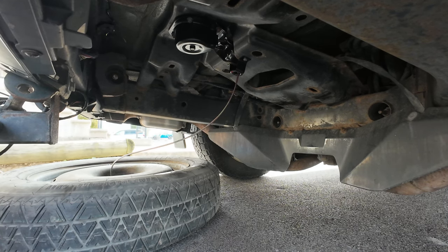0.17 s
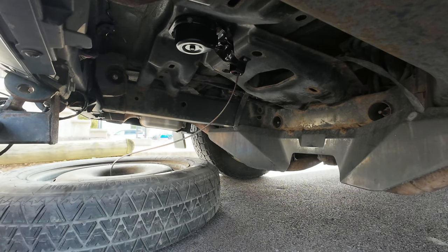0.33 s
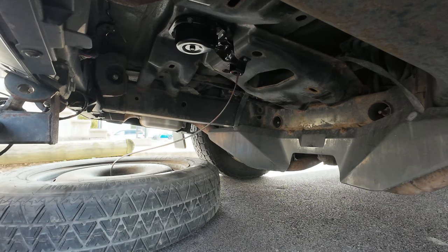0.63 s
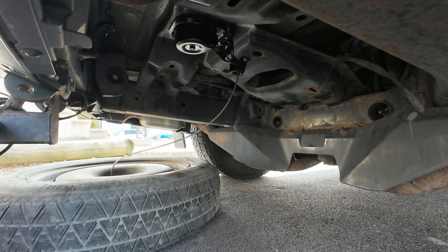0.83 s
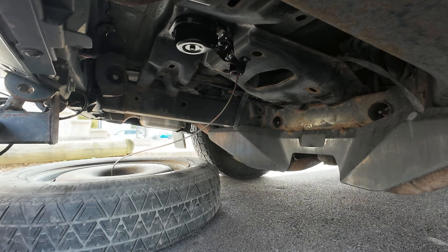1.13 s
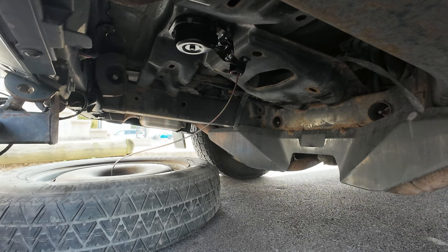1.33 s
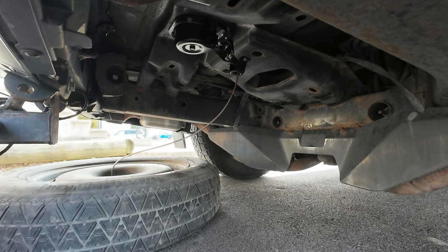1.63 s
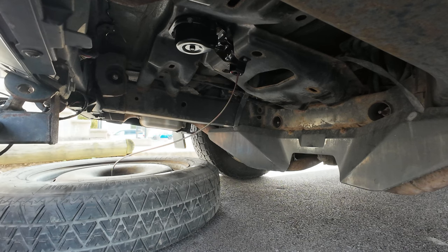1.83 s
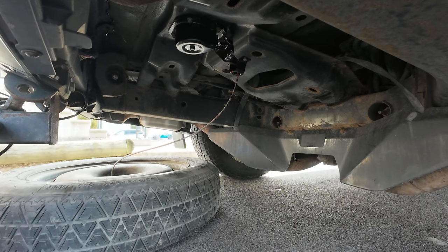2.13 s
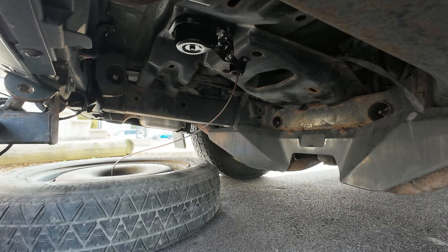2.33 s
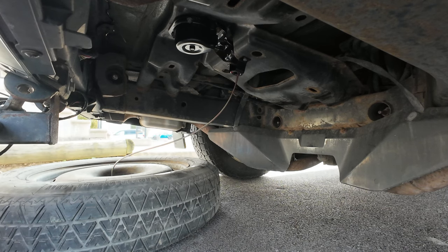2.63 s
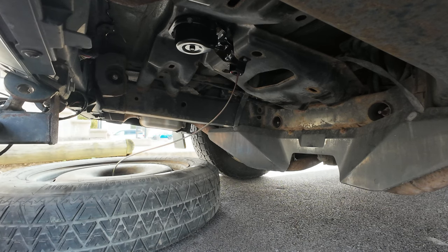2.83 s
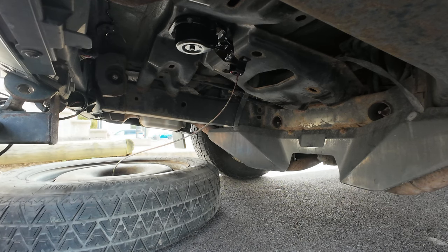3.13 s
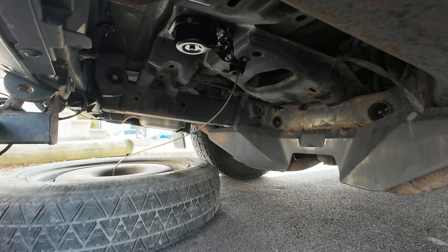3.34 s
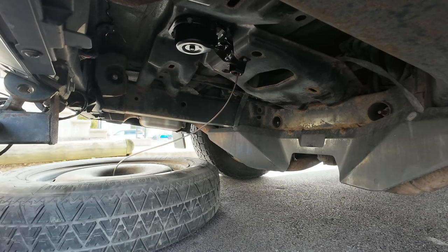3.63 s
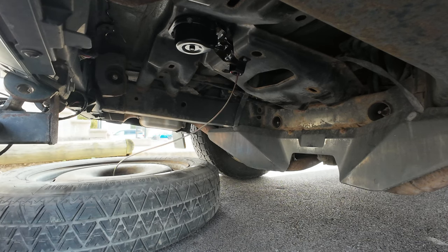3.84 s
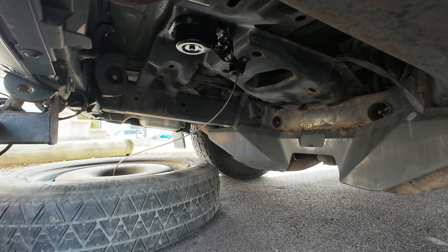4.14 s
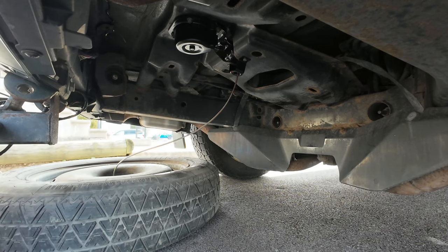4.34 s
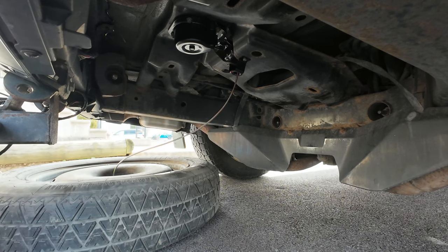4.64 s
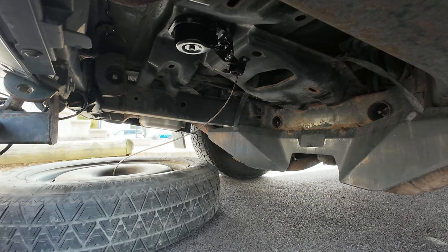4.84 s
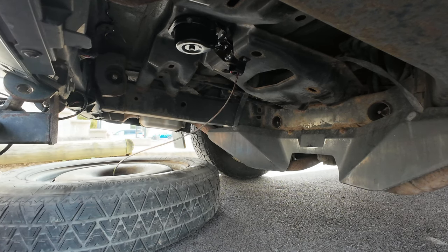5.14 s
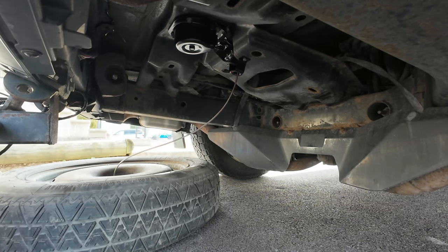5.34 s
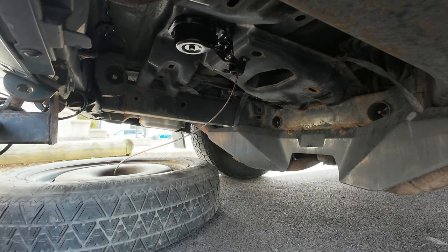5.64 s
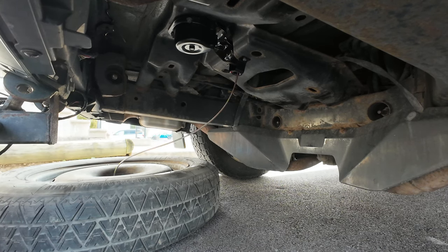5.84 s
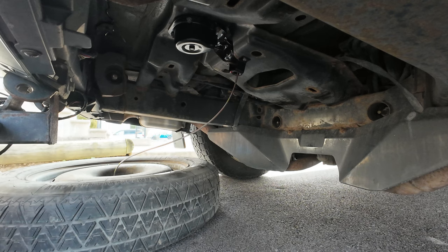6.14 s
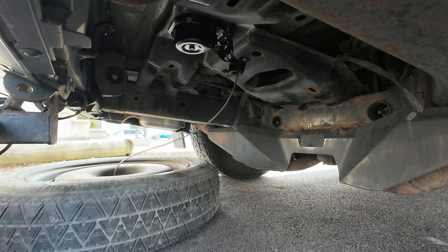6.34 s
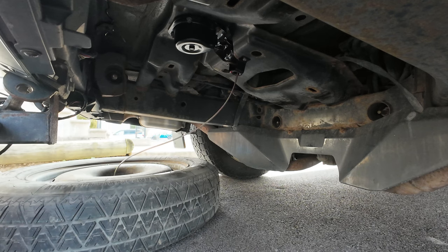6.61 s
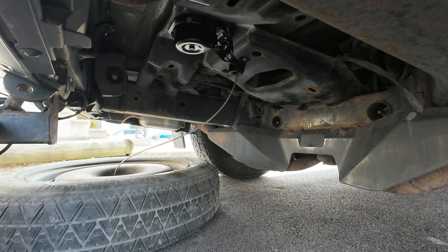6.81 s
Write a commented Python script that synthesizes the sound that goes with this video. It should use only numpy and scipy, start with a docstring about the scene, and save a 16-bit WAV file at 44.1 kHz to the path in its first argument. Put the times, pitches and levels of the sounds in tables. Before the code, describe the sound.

A spare tire hoist is cranked by hand, heard close and straight ahead from underneath a vehicle. From the start, uneven pushes come about three times a second, alternately hard and easy. Each makes dry gears grind and a steel cable rasp and crackle over its guide, while the loose crank rod knocks dully and steel parts clank and occasionally ping. The sounds ring through the frame, with low thumps in the floor pan and a short, tight echo. The cranking is strongest from about 2 to 3.9 seconds, then thins to lighter ticks and a couple of strokes. One hard clunk lands at about 4.9 seconds, followed by a small scrape and a brief rest. The winding resumes softly around 5.5 seconds, grows firmer until 6.1, eases, and pushes again near 6.8 seconds. A very faint, low, distant rumble continues underneath.

```python
"""Cranking a spare tire hoist

Heard from under the vehicle, each push on the crank makes dry gears grind and a steel cable rasp over
its guide, while the loose crank rod knocks in its socket. It all rings through the steel frame and
booms in the floor pan, over a faint, distant rumble. After one hard clunk the cranking rests briefly."""
import sys
import numpy as np
from scipy import signal
from scipy.fft import rfft, irfft, next_fast_len
from scipy.io import wavfile
from scipy.ndimage import uniform_filter1d

SR = 44100
rng = np.random.default_rng(int(sys.argv[2]) if len(sys.argv) > 2 else 0)


def file_out(sig):
    """Save sig as 16-bit WAV at sys.argv[1]."""
    # one column per channel
    cols = np.atleast_2d(sig).T
    # limit, then scale
    lim = np.clip(cols, -1, 1)
    pcm = np.round(lim * 32767).astype(np.int16)
    wavfile.write(sys.argv[1], SR, pcm)


N = 307377


def amp(db):
    """Turn decibels into a gain."""
    return 10 ** (np.asarray(db) / 20)


def unit(x):
    """Scale x to an average (rms) level of 1."""
    return x / np.sqrt(np.mean(x ** 2) + 1e-20)


def along(points, hz):
    """Read between a table's (f/Hz, value) points on a log frequency axis."""
    f, values = np.transpose(points)
    return np.interp(np.log(hz + 1), np.log(f + 1), values)


def filtered(x, response):
    """Give each frequency in x the gain response(hz)."""
    size = next_fast_len(N + SR // 2)
    return irfft(rfft(x, size) * response(np.fft.rfftfreq(size, 1 / SR)), size)[..., :N]


def steadied(x, seconds):
    """Even out slow swells. Row 0 of x is the mid (both ears alike), row 1 the side (ears opposite)."""
    power = uniform_filter1d(x[0] ** 2, int(seconds * SR))
    return x / np.sqrt(np.abs(uniform_filter1d(power, int(seconds * SR / 2))) + 1e-12)


# Tone of the distant background: f/Hz, level/dB
RUMBLE_TONE = [(12, -26.5), (20, -29), (38, -0.5), (54, -19.5), (82, -10), (143, -32), (178, -10.5),
               (223, -45), (310, -27.5), (733, -56), (15000, -72.5)]

def distant_rumble():
    """A low, steady rumble from far away."""
    return unit(filtered(rng.standard_normal((2, N)), lambda hz: amp(along(RUMBLE_TONE, hz))))


# Pushes on the crank, about three a second, hard and easy in turn:
# start/s, crest/s, end/s, floor pan boom/dB, gear grind/dB, cable rasp/dB, strand hiss/dB
PUSHES = [(0.0, -0.001, 0.012, -32, -36, -29.5, -42.5), (0.075, 0.195, 0.25, -39.5, -31, -42, -50.5),
          (0.399, 0.5, 0.57, -24.5, -27, -27.5, -40.5), (0.68, 0.809, 0.872, -26.5, -29.5, -38.5, -45.5),
          (1.053, 1.11, 1.178, -31.5, -24, -25.5, -39), (1.362, 1.386, 1.526, -28.5, -28, -35, -47.5),
          (1.696, 1.725, 1.732, -35.5, -40.5, -46, -63.5), (1.756, 1.861, 1.924, -25, -25.5, -29, -38),
          (2.055, 2.081, 2.104, -24, -18.5, -23, -36), (2.148, 2.154, 2.18, -27, -27, -46, -59),
          (2.311, 2.435, 2.542, -26, -24.5, -26, -39), (2.614, 2.616, 2.78, -27, -26, -35, -46.5),
          (2.927, 3.108, 3.157, -25.5, -25.5, -27, -33.5), (3.241, 3.274, 3.29, -24, -21, -28, -40),
          (3.305, 3.388, 3.46, -31, -34, -37.5, -46.5), (3.549, 3.557, 3.57, -36.5, -23, -33.5, -57.5),
          (3.575, 3.64, 3.69, -21.5, -19.5, -25.5, -34), (3.703, 3.743, 3.796, -35.5, -28.5, -25, -34.5),
          (3.856, 3.876, 3.92, -17.5, -19, -23.5, -36), (4.383, 4.44, 4.53, -33, -30.5, -40, -56),
          (4.534, 4.542, 4.593, -28, -21.5, -33.5, -50), (5.006, 5.022, 5.05, -32, -27.5, -32.5, -45),
          (5.413, 5.45, 5.45, -42.5, -40.5, -56.5, -83), (5.499, 5.566, 5.61, -44, -34.5, -59, -76),
          (5.693, 5.742, 5.7, -26.5, -29, -37.5, -48), (5.793, 5.841, 5.9, -29, -28, -27, -34.5),
          (5.893, 5.991, 6.075, -31, -29, -30.5, -41.5), (6.185, 6.193, 6.31, -37, -31.5, -45, -78),
          (6.414, 6.574, 6.59, -50, -36, -45.5, -52.5), (6.765, 6.821, 6.94, -27, -33.5, -44.5, -56.5),
          (6.897, 6.962, 7.18, -30.5, -24.5, -24.5, -32)]
# How boom, grind, rasp and hiss follow a push, one row each (t60 is the time to fade by 60 dB):
# swell/dB, share of the way to the crest where it tops out, sag/dB, release t60/s
PUSH_SHAPES = [(2.2, 0.56, 5, 0.45), (2.4, .97, 7.5, .19), (6.4, 1, 9, .16), (19, 1, 12, 0.09)]
# The hand's weight on the crank, which keeps the gears muttering between pushes: t/s, level/dB
HAND_WEIGHT = [(0, 1), (1.1, 5.5), (1.65, -11.5), (2.1, 9.5), (2.88, -14), (3.5, 5.5), (4.05, -2.5),
               (4.33, -1.5), (4.72, -10.5), (5.1, 4), (5.2, -25.5), (5.38, -24), (5.5, -3), (6.1, 0),
               (6.6, -2), (6.7, -19.5), (6.97, 2)]
# What that weight alone gives when it is at 0 dB: boom/dB, grind/dB, rasp/dB, hiss/dB
MUTTER_LEVELS = [-41, -48, -73, -81.5]

def cranking(attack_s=0.044, roundness=1.45):
    """Gains of boom, grind, rasp and hiss: each push engages, swells, sags and lets go."""
    t = np.arange(0, N, 32) / SR
    weight_db = np.interp(t, *np.transpose(HAND_WEIGHT))
    power = amp(np.add.outer(MUTTER_LEVELS, weight_db)) ** 2
    for start, crest, end, *levels in PUSHES:
        for part, (db, (swell_db, share, sag_db, t60)) in enumerate(zip(levels, PUSH_SHAPES)):
            top = start + share * (crest - start)
            early = np.clip((top - t) / max(top - start, 1 / SR), 0, 1) ** roundness
            late = np.clip((t - top) / max(end - top, 1 / SR), 0, 1) ** roundness
            outside = np.maximum(start - t, 0) / attack_s + np.maximum(t - end, 0) / t60
            power[part] += amp(db - swell_db * early - sag_db * late - 60 * outside) ** 2
    return [np.interp(np.arange(N) / SR, t, np.sqrt(p)) for p in power]


def slips(per_s, spread_db, t60):
    """Dry metal sticks and slips: each tiny, uneven release is a short burst of noise."""
    releases = rng.random(N) < per_s / SR
    sizes = amp(spread_db * np.clip(rng.standard_normal(N), -2, 2))
    fade = amp(-60 * np.arange(SR // 4) / SR / t60)
    energy = np.abs(signal.fftconvolve(releases * sizes ** 2, fade ** 2)[:N])
    return np.sqrt(energy + 0.27 * energy.mean()) * rng.standard_normal((2, N))


def wandering(x, depth_db):
    """The spot where the cable touches moves, so its ringing pitches come and go."""
    spectra = signal.stft(x, nperseg=512)[2]
    drift = rng.standard_normal(spectra.shape[1:])
    for _ in range(2):  # smooth over pitch and time
        drift = uniform_filter1d(uniform_filter1d(drift, size=6, axis=0), size=7, axis=1)
    return signal.istft(spectra * amp(depth_db * unit(drift)), nperseg=512)[1][:, :N]


# Pitches at which the frame and hoist housing ring: f/Hz, width/Hz, boost/dB
FRAME_RINGS = [(168, 23, 8.5), (245.2, 44, 8), (316.4, 36, 7.5), (444, 68, 2), (576, 42, 4.5),
               (906, 56, 5.5), (1078, 232, 12.5), (1358, 32, 9), (1460, 7.8, 8.5), (1635, 25, 7.5),
               (1779, 110, 5), (2090, 73, 6), (2352, 31, 8.5), (2519, 75, 5), (2770, 21, 7.5),
               (3276, 344, 6.5), (3836, 47, 8), (4195, 73, 7), (4915, 240, 9), (6340, 110, 3.5),
               (6310, 69, 5.5), (8020, 970, 7.5), (11090, 405, 4.5), (12300, 1500, 8.5)]

def through_frame(force, tone, size=8192):
    """A force shakes a part with the given tone, and the frame it is bolted to rings along."""
    hz = np.fft.rfftfreq(size, 1 / SR)
    frame_db = sum(boost / (1 + (2 * (hz - f) / width) ** 2) for f, width, boost in FRAME_RINGS)
    # Folding the cepstrum makes the ring come after the force, never before it.
    cepstrum = irfft(np.log(amp(along(tone, hz) + frame_db)))
    cepstrum[1:size // 2] *= 2
    cepstrum[size // 2 + 1:] = 0
    ring = irfft(np.exp(rfft(cepstrum)))
    return signal.fftconvolve(force, ring[None] / np.linalg.norm(ring), axes=1)[:, :N]


# Tones of the floor pan, the gears, the steel parts and the cable's strands: f/Hz, level/dB
PAN_TONE = [(25, -47.5), (50, -16), (72, -6), (92, 1), (104, -2.5), (120, -14), (145, -19), (300, -79.5)]
GEAR_TONE = [(70, -28.5), (140, -1), (210, -5), (400, 0.5), (750, 0.5), (1100, -8.5), (1500, -8),
             (2300, -17.5), (6000, -89)]
STEEL_TONE = [(150, -35.5), (500, -32), (1100, -5.5), (1600, 0), (2500, 1.5), (3400, 0.5), (4300, -1.5),
              (5200, -15), (6400, -16.5), (7500, -26), (10000, -32), (14000, -56)]
STRAND_TONE = [(2000, -49.5), (4000, -23.5), (5500, 16), (7200, -1.5), (10000, 3.5), (12000, -7.5),
               (14000, 2.5), (16000, -12)]

def winding(boom, grind, rasp, hiss):
    """Gears and cable judder together, the floor pan booms, and the strands hiss or crackle."""
    judder = slips(per_s=170, spread_db=2.5, t60=0.034)
    scrape = wandering(judder, depth_db=3.2)
    crackle = wandering(slips(per_s=90, spread_db=2.8, t60=0.022), depth_db=3.5)
    pan = steadied(through_frame(rng.standard_normal((2, N)), PAN_TONE), 0.065)
    gears = steadied(through_frame(judder, GEAR_TONE), 0.04)
    cable = steadied(through_frame(scrape, STEEL_TONE), 0.033)
    catching = hiss / (hiss + amp(-44))  # a harder pull means more crackle
    sliding = catching * unit(crackle) + (1 - catching) * rng.standard_normal((2, N))
    strands = steadied(through_frame(sliding, STRAND_TONE), 0.12)
    return (amp(-1.5) * boom * pan + amp(-2) * grind * gears
            + amp(-0.7) * rasp * cable + amp(-3) * hiss * strands)


def blows(hits, tone, gain_db, ring, width_hz, rise_s, tail_db, tail_t60):
    """Each hit is a burst of chatter that rings at its own pitch, with a weaker shiver behind it."""
    force, t = np.zeros((2, N + SR)), np.arange(SR // 3) / SR
    for s, db, hz, t60 in hits:
        fade = amp(-60 * t / t60) + amp(tail_db - 60 * t / tail_t60)
        shape = fade * (1 - np.exp(-t / rise_s))
        chatter = rng.standard_normal((2, len(t)))
        ringing = unit(signal.lfilter(*signal.iirpeak(hz, hz / width_hz, SR), chatter))
        burst = shape * (chatter + ring * ringing)
        burst *= np.linalg.norm(shape) / np.linalg.norm(burst[0])
        start = round(s * SR)
        force[:, start:start + len(t)] += amp(db + gain_db) * burst
    return through_frame(force, tone)


# Knocks of the crank rod: t/s, level/dB, f/Hz
ROD_KNOCKS = [(0.105, -15, 1070), (0.416, -13, 448), (0.485, -7.5, 1110), (0.824, -13.5, 437),
              (1.068, -13, 1030), (1.718, -14.5, 1020), (1.76, -13.5, 900), (2.413, -11, 1090),
              (2.635, -17.5, 879), (3.038, -15.5, 910), (3.266, -13, 1023), (3.399, -16, 990),
              (3.642, -10, 1159), (3.83, -17, 894), (3.858, -8, 1120), (4.062, -33, 860),
              (4.12, -23.5, 1060), (4.227, -22, 1070), (4.538, -12.5, 1074), (4.77, -25, 920),
              (4.859, -12, 269), (5.722, -18, 1160), (5.834, -14, 900), (6.13, -27, 1040),
              (6.505, -25, 578.3), (6.823, -12, 830)]

def rod_knocks(t60=0.067):
    """The loose rod knocks dully in its socket, and again as each push takes up the slack."""
    take_ups = [(start, grind_db + 3.5, 980) for start, _, _, _, grind_db, _, _ in PUSHES]
    hits = [(*row, t60) for row in ROD_KNOCKS + take_ups]
    return blows(hits, GEAR_TONE, gain_db=-6, ring=0.11, width_hz=130,
                 rise_s=0.002, tail_db=-12, tail_t60=0.24)


# Clanks inside the hoist: t/s, level/dB, f/Hz, t60/s
STEEL_CLANKS = [(0.104, -25.5, 2300, 0.055), (0.4838, -13.5, 2480, .13), (0.554, -15, 2160, 0.034),
                (0.5838, -18, 2770, 0.057), (0.707, -17, 2340, 0.072), (0.796, -16, 3000, 0.026),
                (0.982, -36.5, 2080, 0.12), (1.2147, -17.5, 2020, .049), (1.7187, -18, 3080, 0.039),
                (1.7625, -11, 1760, 0.02848), (2.2095, -20, 4400, .02), (2.4115, -9.5, 2070, 0.043),
                (2.605, -17.5, 3210, 0.037), (3.042, -10, 2550, .05), (3.09, -15, 4600, .024),
                (3.1423, -16, 2130, 0.05), (3.2214, -22.5, 1900, .046), (3.265, -7, 1650, .061),
                (3.642, -5.5, 1710, .044), (3.7196, -20, 2150, .088), (4.062, -42, 1990, 0.067),
                (4.12, -30.5, 3270, 0.025), (4.168, -40, 3300, 0.084), (4.228, -42, 2500, 0.038),
                (4.5385, -20, 2360, 0.062), (4.769, -29.5, 1720, .058), (4.8588, -6, 2778, 0.096),
                (5.4989, -27.5, 1810, 0.081), (5.6543, -24, 3270, 0.053), (5.7251, -19, 1712, 0.062),
                (5.833, -17, 1770, 0.055), (5.925, -11.5, 4280, 0.033), (6.061, -18, 3150, 0.047)]

def steel_clanks():
    """Steel strikes steel, with an extra clink as each push takes up the slack."""
    clinks = [(start, rasp_db, 2500, 0.099) for start, _, _, _, _, rasp_db, _ in PUSHES]
    return blows(STEEL_CLANKS + clinks, STEEL_TONE, gain_db=-7.5, ring=0.24, width_hz=400,
                 rise_s=0.0012, tail_db=-17, tail_t60=0.17)


# The main snaps of the cable's strands: t/s, level/dB, f/Hz
STRAND_SNAPS = [(0.394, -37, 13500), (0.4834, -22.5, 7900), (0.5504, -29, 10860), (0.5812, -25.5, 11500),
                (1.1234, -25, 8300), (1.215, -31.5, 8000), (1.7178, -38.5, 8300), (1.914, -32, 11000),
                (1.9605, -29.5, 10700), (2.4092, -18.5, 7160), (2.5009, -21.5, 11600),
                (3.038, -18.5, 13060), (3.0898, -23.5, 13160), (3.265, -23, 7880), (3.6418, -18, 7900),
                (3.7208, -24.5, 8440), (3.744, -23.5, 13500), (4.1906, -50, 7440), (4.5428, -39, 8600),
                (4.8579, -23.5, 6680), (5.652, -48, 13700), (5.8896, -26.5, 12930), (5.975, -27, 8240),
                (6.06, -41, 8570), (6.511, -36.5, 12950)]

def strand_snaps(hiss, strays_per_s=24, low_hz=6940, high_hz=13800, t60=0.047):
    """Strands flick over the guide; stray ones catch at random, as hard as the cable is sliding."""
    strays = []
    for when, size, pitch in rng.random((int(strays_per_s * N / SR), 3)):
        hiss_db = 20 * np.log10(hiss[int(when * N)])
        scatter_db = 2.5 * (2 * size - 1)
        strays.append((when * N / SR, hiss_db + 6 + scatter_db, low_hz + pitch * (high_hz - low_hz)))
    hits = [(*row, t60) for row in STRAND_SNAPS + strays]
    return blows(hits, STRAND_TONE, gain_db=-4.5, ring=1, width_hz=2200,
                 rise_s=0.001, tail_db=-20, tail_t60=0.14)


# Jolts of the whole hoist against the floor pan: t/s, level/dB
HOIST_JOLTS = [(0.087, -20.5), (1.063, -20.5), (2.082, -17.5), (3.263, -15), (3.874, -16.5), (4.433, -22.5),
               (4.858, -14.5), (5.726, -24.5)]

def floor_thumps(pan_hz=90.9, t60=0.14, rise_s=0.015, gain_db=2.5):
    """A jolt pushes the floor pan, which swings at its lowest note like a drum."""
    swing, t = np.zeros(N + SR), np.arange(SR // 2) / SR
    note = np.sin(2 * np.pi * pan_hz * t) * amp(-60 * t / t60) * (1 - np.exp(-t / rise_s))
    for s, db in HOIST_JOLTS:
        swing[round(s * SR):][:len(t)] += amp(db + gain_db) * note / note.max()
    return np.array([swing[:N], np.zeros(N)])


# Pings of a loose steel part: t/s, level/dB, f/Hz, t60/s
STEEL_PINGS = [(0.7955, -15.5, 1670, 0.041), (1.9622, -16, 4420, .095), (2.2093, -17.5, 2224, 0.019),
               (5.5406, -28.5, 2620, 0.055), (5.788, -21, 3750, 0.067), (6.4077, -28, 2660, 0.037)]

def steel_pings():
    """A loose part is flicked and rings with a clear pitch."""
    return blows(STEEL_PINGS, STEEL_TONE, gain_db=-9, ring=0.96, width_hz=390,
                 rise_s=0.001, tail_db=-25, tail_t60=0.15)


# How long the echo under the vehicle lasts: f/Hz, t60/s
ECHO_TIMES = [(100, 0.84), (400, 0.33), (1100, 0.1), (3000, 0.13), (8000, 0.019), (15000, 0.014)]

def underbody_echo(x):
    """Sound bounces between the ground and the floor pan; low notes escape at the open sides."""
    hz, t, spectra = signal.stft(rng.standard_normal((2, SR // 2)), SR, nperseg=256)
    fade = amp(-60 * t / along(ECHO_TIMES, hz)[:, None])
    tail = signal.istft(spectra * fade, SR, nperseg=256)[1]
    trapped = signal.sosfilt(signal.butter(2, 400, "high", fs=SR, output="sos"), x[0])
    delayed = np.pad(trapped, (SR // 300, 0))
    return signal.fftconvolve(delayed[None], tail / np.linalg.norm(tail[0]), axes=1)[:, :N]


# How wide the sound is: f/Hz, side gain/dB
STEREO_WIDTH = [(100, -34.5), (500, -23.5), (1000, -23.5), (2000, -19.5), (4000, -10.5), (8000, -4.5),
                (13000, 0)]
# How it leans to one ear: f/Hz, left over right/dB
STEREO_LEAN = [(1000, 0), (2500, 0.5), (4400, 2), (8000, -2), (15000, -1)]

def scene():
    """The hoist is straight ahead: bass alike in both ears, treble scattered."""
    boom, grind, rasp, hiss = cranking()
    hoist = winding(boom, grind, rasp, hiss)
    hoist += rod_knocks() + steel_clanks() + strand_snaps(hiss) + floor_thumps() + steel_pings()
    mid, side = hoist + amp(-12.5) * underbody_echo(hoist) + amp(-47.5) * distant_rumble()
    side = filtered(side, lambda hz: amp(along(STEREO_WIDTH, hz)))
    ears = np.array([mid + side, mid - side])
    return filtered(ears, lambda hz: amp(np.outer([0.5, -0.5], along(STEREO_LEAN, hz))))


def record(dry):
    """Cut off the very highest treble."""
    return filtered(dry, lambda hz: hz < 15950)


dry = scene()
out = record(dry)
file_out(out)
```